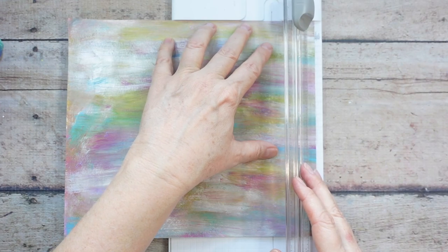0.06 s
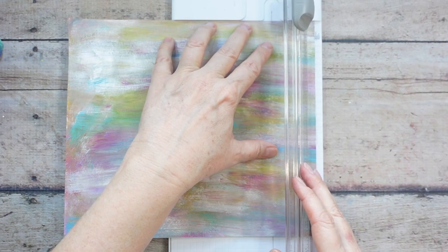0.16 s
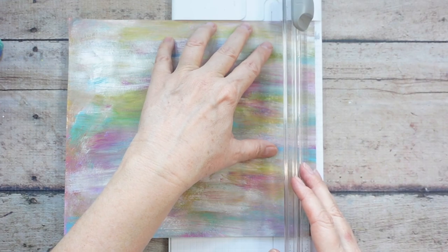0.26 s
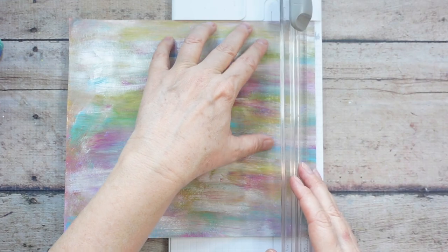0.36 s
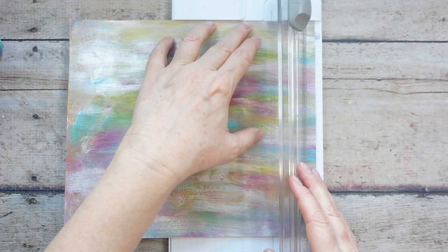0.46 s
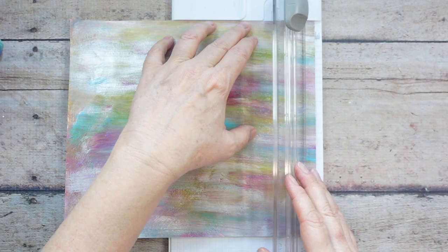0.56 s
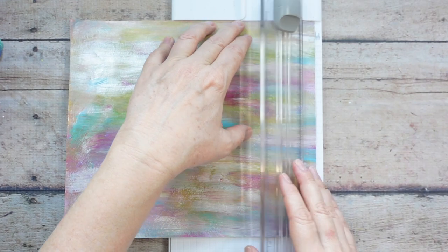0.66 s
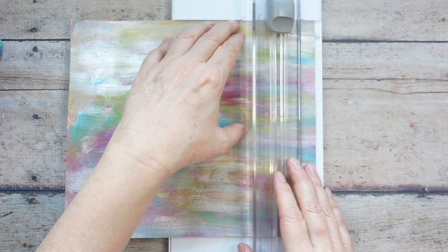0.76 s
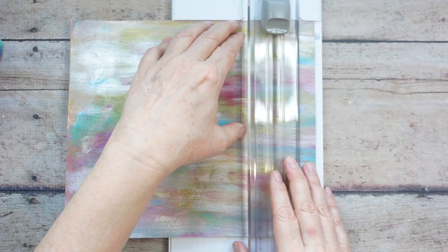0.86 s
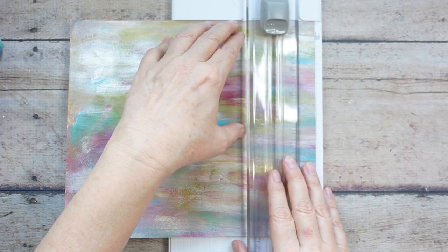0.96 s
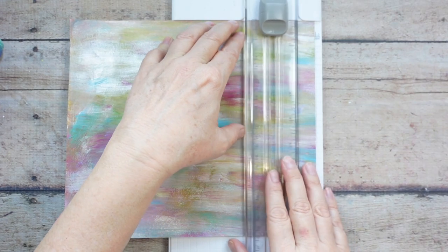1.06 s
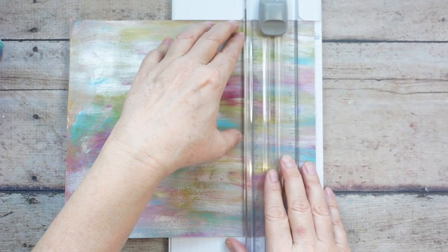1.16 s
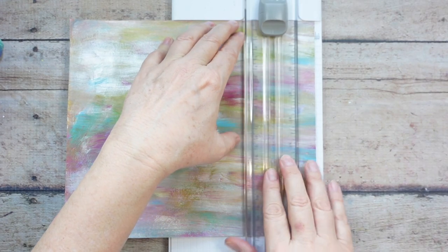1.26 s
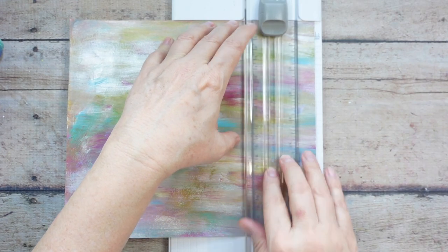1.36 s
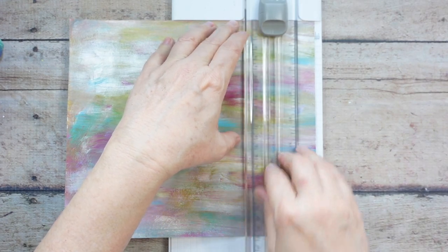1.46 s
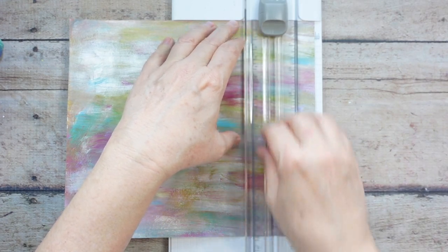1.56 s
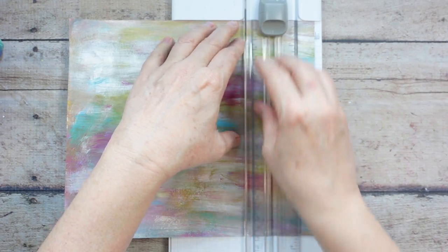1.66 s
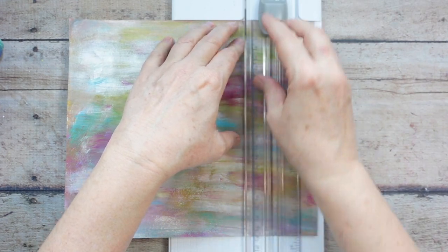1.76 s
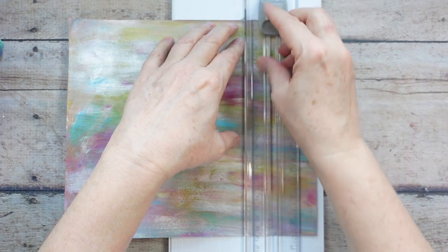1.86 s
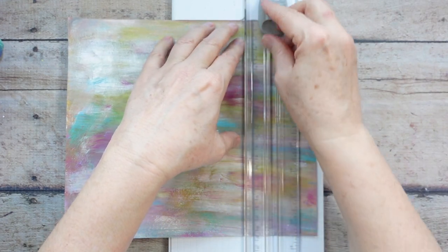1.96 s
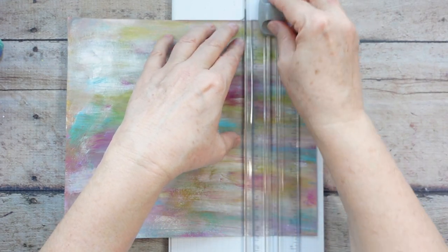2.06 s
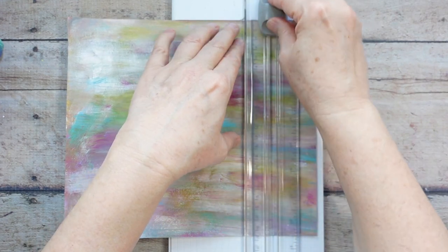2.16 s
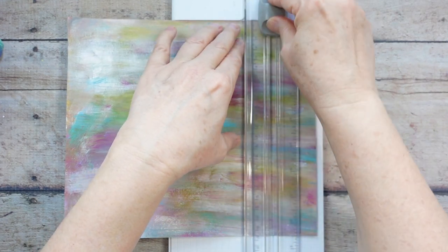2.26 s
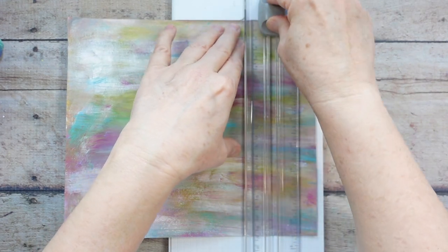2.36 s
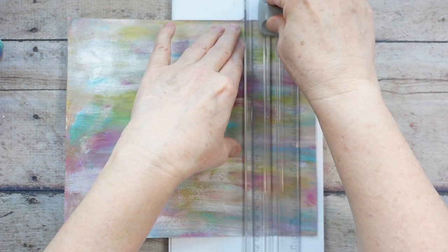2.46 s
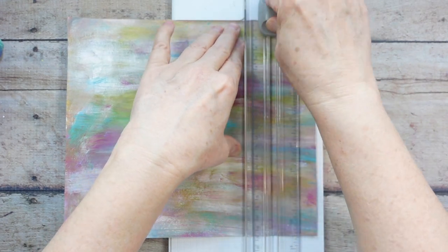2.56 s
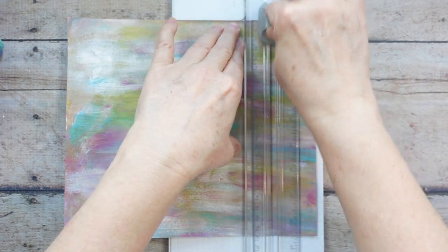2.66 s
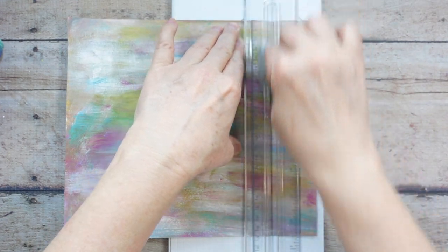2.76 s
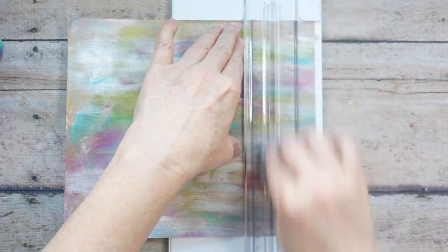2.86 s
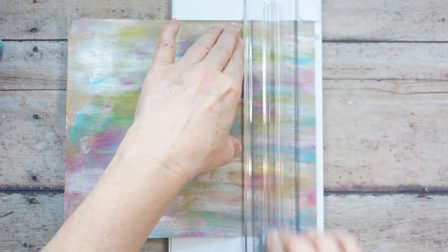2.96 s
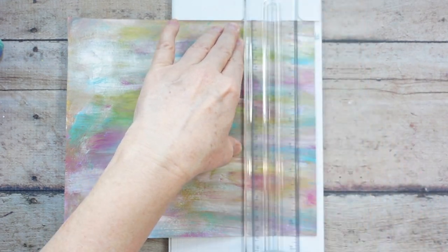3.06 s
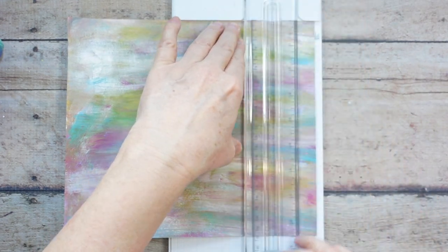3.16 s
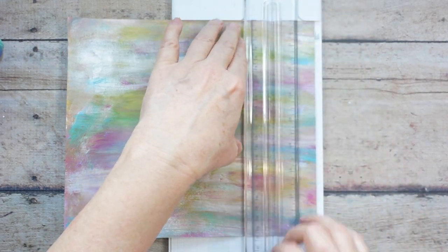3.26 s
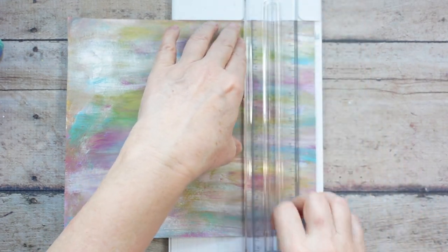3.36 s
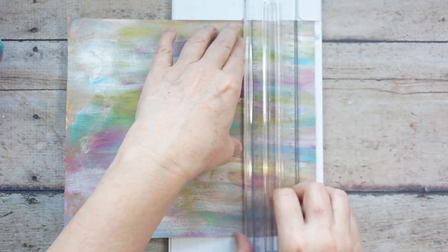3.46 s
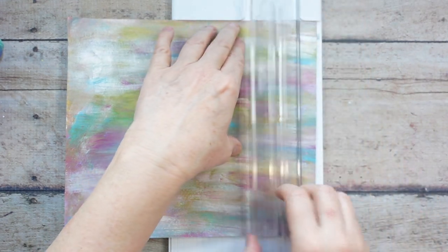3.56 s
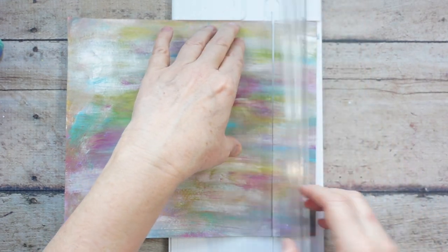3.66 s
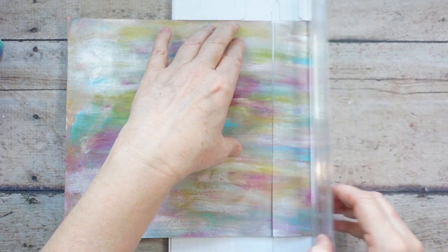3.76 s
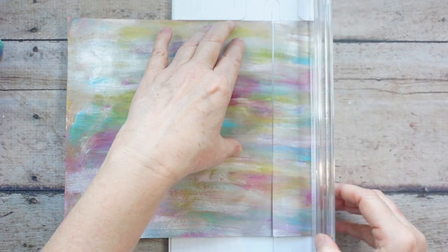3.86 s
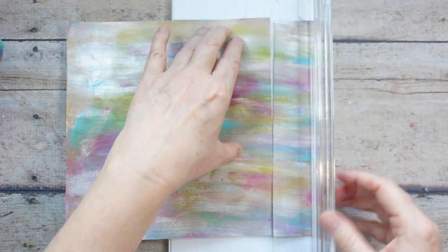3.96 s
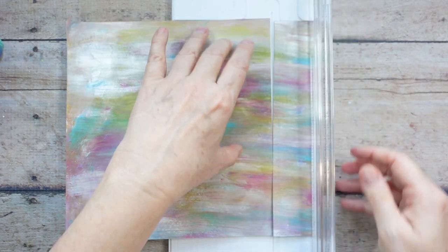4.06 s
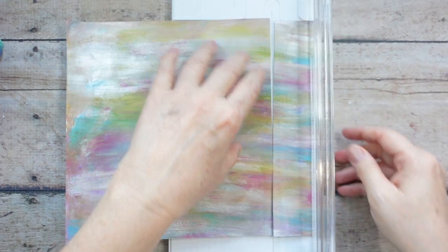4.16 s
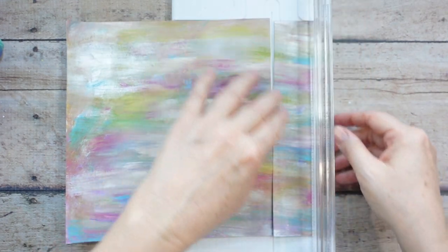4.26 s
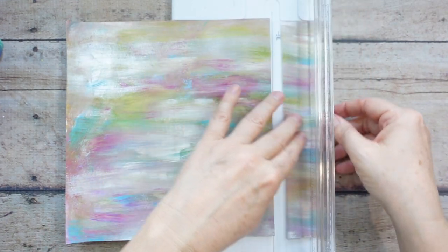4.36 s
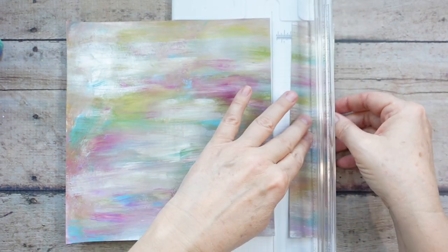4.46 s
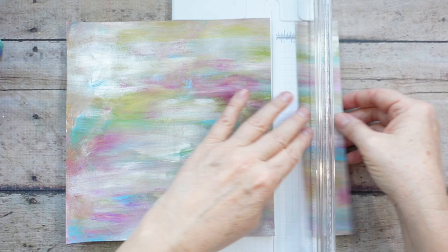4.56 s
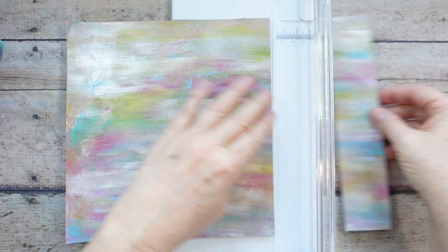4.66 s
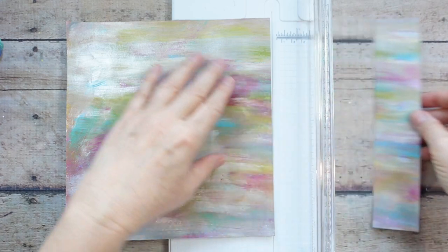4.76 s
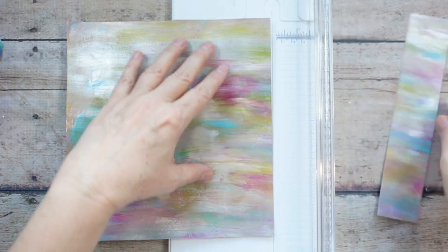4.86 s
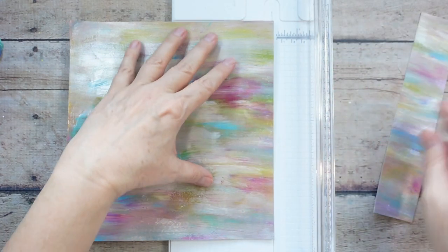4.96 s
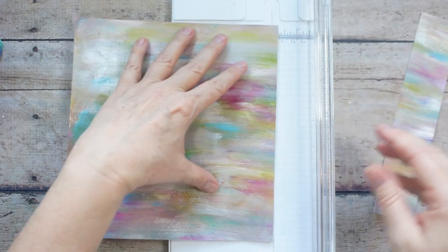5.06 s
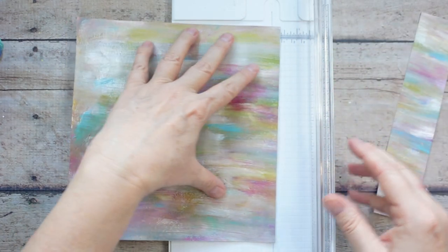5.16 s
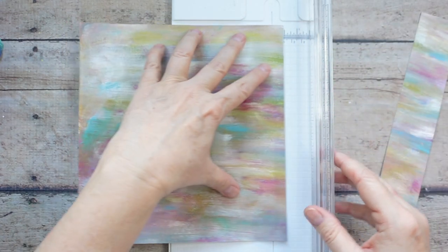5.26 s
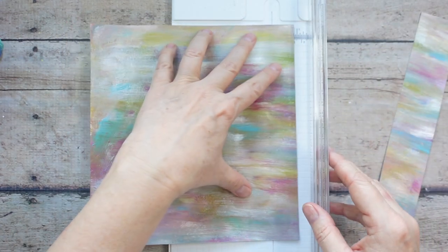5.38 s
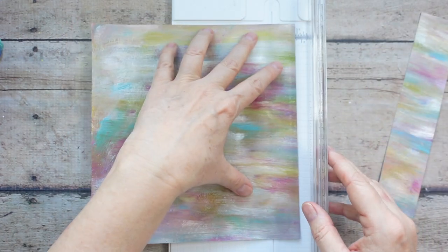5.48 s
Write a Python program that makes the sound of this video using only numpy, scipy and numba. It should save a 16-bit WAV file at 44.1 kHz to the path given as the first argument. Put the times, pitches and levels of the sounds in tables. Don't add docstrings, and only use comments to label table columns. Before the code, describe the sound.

A small, quiet room heard from close above a wooden table, with soft hush and a faint, flickering fan whirr throughout. Faint plastic creaks at 0.35-0.6 s lead to a crisp clap of the rail at 0.64 s and a second snap at 1.1 s. Sparse finger taps, nail scuffs and light rubs follow from 1.3 to 2.3 s. At about 2.65 s the blade bites with a thin high ring, then rasps harshly through the sheet, loudest around 2.9 s with a hard woody knock, another at 3.0 s, and a brief singing release by 3.1 s. Small stop knocks, clicks and finger rubs fill 3.2-3.6 s. The rail lifts with dull scraping at 3.8-3.9 s and clicks sharply at 4.0 s. Paper swishes from 4.36 s, flicks loudly at 4.67 s, peels with a rising whistle at 4.8 s, snaps brightly at 4.91 s, then slides softly until about 5.45 s.

```python
import sys
import numpy as np
from scipy import signal
from scipy.fft import rfft, irfft, next_fast_len
from scipy.io import wavfile
from scipy.ndimage import uniform_filter1d
from numba import njit

SR = 44100
rng = np.random.default_rng(int(sys.argv[2]) if len(sys.argv) > 2 else 0)


def transcribe(u):
    v = np.clip(np.atleast_2d(u).T, -1, 1)
    q = np.round(v * 32767).astype(np.int16)
    wavfile.write(sys.argv[1], SR, q)


def volts(x):
    e = np.asarray(x, float) / 20
    return 10 ** e


N = 243431

# time in seconds, carriage effort in dB, bite of the edge in dB.
CUT_STROKE = [
    (2.6, -78, -1),
    (2.64, -66.5, -1),
    (2.668, -48, -2.5),
    (2.71, -44, -0.5),
    (2.732, -49, 5.5),
    (2.794, -37, 1.5),
    (2.918, -32.5, 1),
    (3.048, -45, 2),
    (3.15, -70, 2),
]
# time in seconds, pitch in Hz, share in dB.
BLADE_SONG = [
    (2.63, 8370, 5),
    (2.71, 8430, -4.5),
    (2.74, 7600, -8),
    (3.0, 7600, -26),
    (3.035, 6900, 11),
    (3.06, 6860, 4.5),
    (3.085, 6960, -20),
]
# resonance in Hz, width in Hz, level in dB.
CUT_BOARD = [(550, 77, -8), (707, 76, 3.5), (848, 76, 3.5), (1055, 58, 7), (1203, 170, 0.5), (1454, 103, 4),
             (1700, 230, 2.5), (2180, 1270, -3.5)]
# resonance in Hz, width in Hz, level in dB.
CUT_FIBRE = [(3400, 270, 2.5), (3970, 480, 5.8), (4500, 550, 7.1), (5000, 470, 8.2), (6000, 1460, 5.7)]
# resonance in Hz, width in Hz, level in dB.
CUT_BLADE = [(6600, 210, -21), (7600, 2000, 1.5), (8640, 1500, 1), (10000, 3500, -8.5),
             (13300, 2700, -10.5), (14900, 1300, -22)]
# mode in Hz, level in dB, 60 dB decay in seconds.
BOARD_MODES = [(511.6, -3.5, 0.81), (747, -3.5, 0.021), (832, 7, 0.035), (1054, 0, 0.023),
               (1255, 2.5, 0.16), (1510, -5.5, 0.031), (1910, 0.5, 0.035)]
# mode in Hz, level in dB, 60 dB decay in seconds.
TABLE_MODES = [(110, -18, 0.71), (178, -0.5, 0.42), (240, -6, 0.089), (364, 6.5, 0.13)]

# frequency in Hz, level in dB.
RUB_COLOUR = [(1200, -44), (2200, 9), (4500, 13), (6500, 4), (8000, -48), (12000, -61)]
# frequency in Hz, level in dB.
HISS_COLOUR = [(5000, -19.5), (7000, 0), (8000, 0), (10000, -2), (13000, -12), (16000, -20)]
# start, rise and fall in seconds, peak in dB, air gap in Hz.
HINGE = [
    (0, .002, 0.078, -80, 3400),
    (.67, 0.0027, 0.18, -62.5, 3100),
    (1.12, 0.0017, 0.26, -68.5, 3440),
]
# start, rise and fall in seconds, peak in dB, air gap in Hz.
CREAK = [
    (.345, 0.07, 0.082, -66, 3440),
    (.44, 0.067, 0.13, -66.5, 3400),
    (1.14, 0.071, 0.07, -69, 3450),
]
# start, rise and fall in seconds, peak in dB, air gap in Hz.
SETTLE = [
    (.646, 0.0017, 0.03, -50.5, 3080),
    (1.106, 0.0013, 0.015, -49.5, 3680),
]
# start, rise and fall in seconds, peak in dB, air gap in Hz.
FINGERS = [(1.515, 0.015, 0.024, -62.5, 3400), (1.555, 0.017, 0.083, -58, 3550),
           (2.122, 0.0011, 0.017, -59, 4600), (2.138, .002, 0.35, -72, 4660),
           (2.28, 0.088, 0.045, -60.5, 4350), (3.22, 0.026, 0.036, -62.5, 3400),
           (3.308, 0.0021, 0.063, -64.5, 3120), (3.39, 0.0073, 0.089, -60, 2950),
           (3.46, 0.032, 0.092, -58, 2820), (3.58, 0.016, 0.083, -66.5, 3970),
           (3.66, 0.0095, 0.13, -72, 2770)]
# start, rise and fall in seconds, peak in dB, air gap in Hz.
REACH = [
    (1.68, 0.19, 0.22, -73.5, 5670),
    (4.25, 0.057, 0.062, -76.5, 5940),
]
# start, rise and fall in seconds, peak in dB, air gap in Hz.
LIFT = [(3.8175, 0.0016, 0.034, -52, 1100), (3.828, 0.017, 0.028, -42.5, 1400),
        (3.855, 0.019, .035, -47, 1520), (3.889, 0.0038, 0.039, -47.5, 1390),
        (3.9, 0.0089, 0.07, -50.5, 1400), (4.425, 0.021, 0.034, -53.5, 1180),
        (4.455, 0.016, 0.032, -49, 1540), (2.645, 0.028, 0.037, -61, 1130), (2.685, .022, .025, -47, 1600),
        (2.79, .015, .02, -44, 850), (4.64, .012, .02, -56, 1600)]
# start, rise and fall in seconds, peak in dB, air gap in Hz.
SCRAPE = [
    (3.832, 0.019, 0.016, -55, 3550),
    (3.888, 0.011, 0.014, -54, 3560),
    (3.955, .004, 0.018, -64, 4200),
]
# start, rise and fall in seconds, peak in dB, air gap in Hz.
RAIL_RING = [
    (3.991, 0.0017, 0.018, -57, 3000),
    (4.02, .002, 0.22, -66, 3070),
]
# start, rise and fall in seconds, peak in dB, air gap in Hz.
REBOUND = [
    (4.008, 0.0038, 0.028, -45, 3000),
    (4.062, .01, .012, -55, 3150),
    (2.3, .003, .01, -66, 3500),
    (3.255, 0.0026, .025, -56, 3450),
]
# start, rise and fall in seconds, peak in dB, air gap in Hz.
SWISH = [
    (4.36, 0.048, 0.096, -47, 5570),
    (4.595, 0.025, 0.035, -51, 4700),
    (4.88, 0.031, 0.069, -51.5, 4800),
    (5.35, 0.028, 0.11, -59, 7040),
]
# start, rise and fall in seconds, peak in dB, air gap in Hz.
DRAG = [
    (4.5, 0.055, 0.03, -64, 4500),
    (4.63, .03, 0.033, -61.5, 3000),
    (4.94, 0.17, 0.081, -63.5, 4640),
]
# start, rise and fall in seconds, peak in dB, air gap in Hz.
TUG = [
    (4.562, 0.0057, 0.037, -54, 4700),
    (4.605, 0.019, .012, -61, 3300),
]
# start, rise and fall in seconds, peak in dB, air gap in Hz.
FLICK = [
    (4.655, 0.023, 0.024, -33, 2300),
    (4.658, 0.0057, .01, -44.5, 3500),
]
# start, rise and fall in seconds, peak in dB, air gap in Hz.
TRAIL = [
    (4.695, .002, 0.096, -59, 2330),
]
# start, rise and fall in seconds, peak in dB, air gap in Hz.
PEEL = [
    (4.804, 0.0017, 0.093, -51.5, 2620),
]
# start, rise and fall in seconds, peak in dB, air gap in Hz.
SKIM = [
    (5.1, 0.087, 0.09, -61, 4670),
]
# start, rise and fall in seconds, peak in dB, air gap in Hz.
PUSH = [
    (5.2, 0.11, 0.1, -55, 5060),
    (5.33, .07, .075, -58, 5200),
]

# time in seconds, gap pitch in Hz, level in dB.
GAP_SLIDES = [
    [(.35, 3450, -80), (.45, 3400, -76), (.53, 3300, -64.5), (.6, 3100, -74), (.63, 3120, -77)],
    [(4.803, 2700, -62), (4.808, 2600, -49.5), (4.835, 2640, -53.5), (4.86, 2800, -65),
     (4.885, 3470, -55.5), (4.912, 4360, -57.5), (4.94, 4800, -70), (4.955, 4800, -78)],
    [(4.97, 4650, -82), (5.0, 4520, -67), (5.06, 4500, -73), (5.1, 4350, -64), (5.14, 4370, -65),
     (5.175, 4600, -56), (5.2, 5030, -61), (5.25, 6000, -67), (5.3, 6600, -76)],
    [(5.22, 4500, -76), (5.31, 4600, -66), (5.4, 4900, -69), (5.45, 5000, -82)],
]
GAP_SHARES = [.16, .2, .15, .25]

# time in seconds, peak in dB, crack in Hz, board against crack in dB.
RAIL_TAPS = [(.6392, -33, 3460, -20), (1.1044, -38, 4400, -10.5), (1.5174, -52.5, 3450, 3),
             (1.6187, -50, 4930, -14), (1.6844, -56.5, 3580, 4), (2.1176, -43.5, 5050, -9),
             (2.2064, -59, 3550, 1), (2.595, -54.5, 2370, -21), (3.8182, -52, 2000, 5),
             (3.8447, -51, 2310, 14.5), (4.187, -56.5, 5200, -8)]
# time in seconds, peak in dB, crack in Hz, board against crack in dB.
NAIL_SCUFFS = [(1.3169, -56, 3720, -20), (1.3443, -53.5, 7400, -6), (1.5713, -49.5, 9400, -15),
               (2.0956, -50, 2500, -5), (3.5134, -45, 2340, 3.5), (3.5853, -53, 4830, -18),
               (4.6014, -43, 3300, -2.5), (5.1672, -53, 4430, -19), (5.3094, -49.5, 6230, 1.5)]
# time in seconds, peak in dB, crack in Hz, board against crack in dB.
CARRIAGE_KNOCKS = [(1.5287, -52, 2200, -6), (2.1414, -65.5, 3660, 16), (2.2732, -45, 5500, -1.5),
                   (2.6455, -44, 1720, -13), (2.898, -41, 7380, 0), (2.9234, -22, 2580, -0.5),
                   (2.9349, -31, 6180, -3), (3.0014, -29.5, 2360, 2), (3.0689, -38, 3250, -1.5),
                   (3.2555, -47, 3470, 7), (3.3079, -48, 4500, 10.5), (3.2615, -59, 3400, 10.5),
                   (3.8906, -57, 2300, 20.5)]
# time in seconds, peak in dB, crack in Hz, board against crack in dB.
END_STOP = [
    (3.2208, -43, 5100, 6.9),
    (2.8, -44.5, 2200, 3.9),
    (4.9, -75, 1500, 16),
]
# time in seconds, peak in dB, crack in Hz, board against crack in dB.
CRISP_SNAPS = [(3.3294, -49, 3500, -11), (3.3955, -44, 4500, -13), (2.672, -49, 10000, -18),
               (3.8038, -53, 4500, -22), (3.8041, -51, 9900, -21), (4.0844, -46, 5000, -5.5),
               (4.148, -47, 6800, -16), (4.529, -49, 4500, -6), (1.0934, -34.5, 3580, -30),
               (1.0978, -39, 4500, -11), (3.409, -50.5, 2500, -3.5), (3.5145, -42.5, 7050, -13),
               (4.9137, -30.5, 7650, -31)]
# time in seconds, peak in dB, crack in Hz, board against crack in dB.
RAIL_SNAP = [
    (4.0056, -22.5, 3040, -20.5),
]
# time in seconds, peak in dB, crack in Hz, board against crack in dB.
PAPER_SNAPS = [
    (4.6718, -47, 2220, 7),
    (4.678, -34.5, 2700, -11),
    (4.8055, -43, 2740, -7.5),
    (4.8244, -42, 2740, -24),
]
# time in seconds, peak in dB, pitch in Hz.
BUMPS = [(2.789, -58, 100), (2.861, -58, 95), (2.93, -56, 100), (3.42, -70, 95), (3.62, -74, 95),
         (3.29, -63.5, 295), (0.649, -72, 118), (1.106, -62.5, 148), (1.105, -53.5, 533), (1.2, -82, 170),
         (1.501, -61, 363), (1.528, -56.5, 378), (1.534, -65, 110), (1.66, -60, 337), (1.692, -60, 123),
         (1.878, -64, 276), (2.138, -63, 360), (2.275, -63, 122), (2.358, -60, 373), (2.725, -69, 350),
         (2.893, -34, 360), (3.002, -46.5, 155), (3.681, -62, 414), (3.223, -55, 136), (3.398, -59, 386),
         (3.512, -53, 290), (3.817, -53.5, 172), (3.846, -61, 157), (3.892, -57, 190), (4.45, -61, 164),
         (4.599, -66, 377), (5.352, -59.5, 121)]

# time in seconds, left minus right in dB.
HANDS = [
    (0, 1),
    (2.9, -1),
    (3.4, 1.5),
    (3.75, 2),
    (4.9, -4),
    (5.2, 1),
]
# frequency in Hz, level in dB.
AIR_MID = [(15, -81), (25, -67), (114, -20), (292, -20), (544, -19), (623, -19.5), (886, -8), (1040, -19),
           (1130, -19), (1480, -15), (2470, -25.5), (4990, -30), (7290, -33), (9810, -34), (16000, -37.5)]
# frequency in Hz, level in dB.
AIR_SIDE = [(15, -70), (90, -26), (383, -16.5), (575, -17.5), (862, -6.5), (1330, -16), (1690, -14),
            (10100, -34), (16000, -51)]


def blade():
    at, fade, (effort_db, bite_db) = stroke(CUT_STROKE)
    sing_hz, sing_db = track(BLADE_SONG, np.arange(N))
    judder = grit(N, spread_db=2.2, patchy_db=1.5, rate=120)
    tear = grit(N, spread_db=2.2, patchy_db=1.6, rate=150)

    board = body(judder, CUT_BOARD, wander_db=2.2)
    table_rumble = steep(body(judder, widths(TABLE_MODES), wander_db=4.2), hz=240.0, share=2.3)
    carriage = board + volts(-13) * table_rumble

    sing = steep(tear, sing_hz, share=.1) * volts(2 * walk(40))
    hiss = body(tear, CUT_BLADE, wander_db=2.2) + volts(sing_db) * sing
    hiss /= np.sqrt(1 + volts(2 * sing_db))
    edge = volts(-4) * body(tear, CUT_FIBRE, wander_db=2.0) + volts(-3.5) * hiss

    out = np.zeros(N)
    out[at] = (carriage[at] + volts(bite_db) * edge[at]) * volts(effort_db) * fade
    return out


def rubbing():
    out = np.zeros(N)
    slip = grit(N, spread_db=1.8, patchy_db=1.8, rate=90)
    plain = colour(slip, RUB_COLOUR)
    hiss = colour(slip, HISS_COLOUR)
    board = steep(body(slip, widths(BOARD_MODES, grip=6.5), wander_db=3.2), hz=1200.0, share=3.3)
    other = np.roll(slip, shift=1500)
    gap_swell = volts(1.9 * walk(44))
    edge_swell = volts(1.5 * walk(40))

    def add(rows, lead_db, drop_db, gap_db, share, octaves, hiss_db, board_db,
            edge_hz=7500, edge_db=-15, edge_share=0.28, bloom=0.27, late=1.8):
        for s, rise, fall, peak_db, hz in rows:
            rise, fall = max(rise, .001), max(fall, .005)
            at, fade, (db, part) = stroke([(s, peak_db - lead_db, 0),
                                           (s + rise, peak_db, rise / (rise + fall)),
                                           (s + rise + fall, peak_db - drop_db, 1)])
            gap_hz = hz * 2 ** (octaves * part ** late)
            gap = steep(other[at], gap_hz, share) * gap_swell[at] * volts(bloom * (db - peak_db))
            edge = steep(slip[at], edge_hz, edge_share) * volts(edge_db) * edge_swell[at]
            sound = (plain[at] + volts(gap_db) * gap) / np.sqrt(1 + volts(2 * gap_db))
            sound += volts(hiss_db) * (hiss[at] + edge)
            sound += volts(board_db) * board[at]
            out[at] += sound * volts(db - 3) * fade

    add(HINGE, lead_db=6, drop_db=10.0, gap_db=-1, share=.17, octaves=-0.079, hiss_db=-10, board_db=-3.0)
    add(RAIL_RING, lead_db=8, drop_db=10.5, gap_db=-23.0, share=.2, octaves=.01, hiss_db=-10, board_db=0.5)
    add(CREAK, lead_db=7, drop_db=12, gap_db=-4.5, share=0.12, octaves=-0.19, hiss_db=-3.5, board_db=-6,
        bloom=.9)
    add(SKIM, lead_db=16, drop_db=8.0, gap_db=9, share=0.68, octaves=0.3, hiss_db=-7.0, board_db=-35)
    add(SCRAPE, lead_db=18.5, drop_db=18, gap_db=13, share=0.53, octaves=.01, hiss_db=-17, board_db=-15)
    add(REBOUND, lead_db=8, drop_db=18, gap_db=-2, share=0.15, octaves=.01, hiss_db=-20, board_db=-16.5)
    add(TUG, lead_db=10, drop_db=0, gap_db=0, share=.4, octaves=-0.054, hiss_db=-9.5, board_db=-4,
        edge_hz=6480, edge_db=-3, edge_share=.05)
    add(TRAIL, lead_db=18, drop_db=13, gap_db=-41, share=.2, octaves=0.011, hiss_db=-10, board_db=-4)
    add(PUSH, lead_db=15.5, drop_db=20, gap_db=-3.5, share=0.71, octaves=0.18, hiss_db=-3.0, board_db=-1.5,
        edge_hz=6800, edge_db=-7, edge_share=0.17)
    add(SETTLE, lead_db=-7, drop_db=19, gap_db=-3.0, share=0.037, octaves=.01, hiss_db=-30, board_db=-6.0)
    add(FINGERS, lead_db=16, drop_db=18, gap_db=-10, share=0.091, octaves=-0.0032, hiss_db=-5.0, board_db=2,
        edge_hz=14000, edge_db=-20.5, edge_share=0.083)
    add(REACH, lead_db=2.0, drop_db=18, gap_db=-2, share=0.17, octaves=0.034, hiss_db=0.5, board_db=1.5,
        edge_hz=9950, edge_db=-8.0, edge_share=0.09)
    add(LIFT, lead_db=18, drop_db=17.5, gap_db=12.5, share=0.45, octaves=-0.052, hiss_db=-36, board_db=-1.0,
        bloom=0.055)
    add(SWISH, lead_db=19, drop_db=25.0, gap_db=-9, share=0.49, octaves=-0.3, hiss_db=-3.0, board_db=-11.0,
        edge_hz=6900, edge_db=-8.5, edge_share=0.56)
    add(DRAG, lead_db=8, drop_db=5.0, gap_db=-12.0, share=0.38, octaves=0.11, hiss_db=-4.5, board_db=-6.0,
        edge_hz=6800, edge_db=-6, edge_share=0.099)
    add(FLICK, lead_db=20, drop_db=26, gap_db=8, share=0.42, octaves=.01, hiss_db=-23.0, board_db=-14.5)
    add(PEEL, lead_db=13, drop_db=4, gap_db=2.5, share=0.57, octaves=0.96, hiss_db=-13.5, board_db=-21,
        bloom=0.058, late=5.4)
    return out


def gaps():
    out = np.zeros(N)
    fine = grit(N, spread_db=1.5, patchy_db=1.2, rate=70)
    for table, share in zip(GAP_SLIDES, GAP_SHARES):
        at, fade, (hz, db) = stroke(table)
        out[at] += steep(fine[at], hz, max(share, .03)) * volts(db) * fade
    return out


def taps():
    out = np.zeros(N + SR)
    t = np.arange(SR // 12) / SR

    def add(rows, board_hz, scatter_s, share=0.9, bright=0.41):
        for s, db, hz, board_db in rows:
            push = 0.26 * rng.standard_normal(len(t)) * np.exp(-t / max(scatter_s, 1e-4))
            push[0] = 1
            crack = steep(push, hz, share) + bright * steep(push, 4200.0, 0.78)
            crack /= np.max(np.abs(crack))
            board = steep(body(push, widths(BOARD_MODES)), board_hz, 1.92)
            board += 0.62 * steep(push, board_hz, .15)
            board *= 1 - np.exp(-t / 0.0038)
            board /= np.max(np.abs(board))
            i = int(s * SR)
            out[i:i + len(t)] += volts(db) * (crack + volts(board_db) * board)

    add(RAIL_TAPS, board_hz=860, scatter_s=0.0058)
    add(NAIL_SCUFFS, board_hz=863, scatter_s=0.008)
    add(CARRIAGE_KNOCKS, board_hz=1340, scatter_s=0.0039)
    add(END_STOP, board_hz=527, scatter_s=0.0079)
    add(CRISP_SNAPS, board_hz=1466, scatter_s=0.00082, share=0.76, bright=0.19)
    add(RAIL_SNAP, board_hz=1400, scatter_s=0.00079, share=0.35, bright=0.25)
    add(PAPER_SNAPS, board_hz=1850, scatter_s=0.0026)
    return out[:N]


def bumps():
    out = np.zeros(N + SR)
    t = np.arange(SR // 4) / SR
    for s, db, hz in BUMPS:
        push = rng.standard_normal(len(t)) * (1 - np.exp(-t / 0.00094)) * np.exp(-t / 0.035)
        boom = steep(push, hz, share=.9)
        i = int(s * SR)
        out[i:i + len(t)] += volts(db) * boom / np.max(np.abs(boom))
    return out[:N]


def echoes(x):
    low_t60_s, treble_t60_s, first_s = .33, 0.37, 0.0064
    t = np.arange(SR // 2) / SR
    low = signal.lfilter([.3], [1, -.7], rng.standard_normal((2, len(t))))
    high = np.diff(rng.standard_normal((2, len(t) + 1))) / 4
    tail = low * volts(-60 * t / low_t60_s) + high * volts(-60 * t / treble_t60_s)
    tail *= np.clip(t / first_s, 0, 1) ** 2
    tail /= np.sqrt(np.sum(tail ** 2, axis=1, keepdims=True))
    return signal.fftconvolve(x[None], tail, axes=1)[:, :N]


def air():
    fan_hz, fan_width_hz, fan_db = 867, 90, -74.5
    hush_db, side_db, left_db = -71, -69.5, 3.5
    sides = np.array([[1], [-1]])
    mid = colour(rng.standard_normal(N), AIR_MID)
    side = colour(rng.standard_normal(N), AIR_SIDE)
    whirr = band(rng.standard_normal(N), fan_hz, fan_width_hz)
    flicker = volts(1.5 * walk(9))
    fan = unit(band(whirr, fan_hz, 2 * fan_width_hz)) * volts(fan_db) * flicker
    swell_db = 1.2 * walk(2.5)
    middle = volts(hush_db + swell_db) * mid + fan
    return middle * volts(left_db * sides / 2) + volts(side_db) * side * sides


def grit(count, spread_db, patchy_db, rate):
    size = volts(spread_db * rng.exponential(size=count) + patchy_db * walk(rate, count=count))
    return unit(rng.standard_normal(count) * size)


def walk(rate, count=N):
    k = max(int(SR / rate), 1)
    levels = rng.standard_normal(count // 64 + 2)[:count // k + 1]
    held = np.repeat(levels, k)[:count]
    return uniform_filter1d(uniform_filter1d(held, k), k)


def stroke(table):
    at = np.arange(int(table[0][0] * SR), min(int((table[-1][0] + 0.0041) * SR), N))
    fade = np.clip(np.minimum(at - at[0], .5 * (at[-1] - at)) / (0.00035 * SR), 0, 1)
    return at, fade, track(table, at)


def track(table, at):
    s, *columns = np.transpose(table)
    return [np.interp(at / SR, s, c) for c in columns]


def widths(modes, grip=8.6):
    return [(hz, grip * np.log(1000) / np.pi / t60, db) for hz, db, t60 in modes]


def body(x, peaks, wander_db=0.):
    total = np.zeros(len(x))
    for k, (hz, width, db) in enumerate(peaks):
        swell = volts(db + wander_db * walk(35.44, count=len(x)))
        total += (-1) ** k * swell * band(x, hz, width)
    return unit(total)


def steep(x, hz, share):
    return unit(band(band(x, hz, share * hz), hz, share * hz))


def band(x, hz, width):
    hz = np.clip(hz, 30, .45 * SR)
    return svf(x, np.tan(np.pi * hz / SR) + 0 * x, width / hz + 0 * x)


@njit
def svf(x, g, k):
    y, b, l = np.empty(len(x)), 0., 0.
    for i in range(len(x)):
        v = (b + g[i] * (x[i] - l)) / (1 + g[i] * (g[i] + k[i]))
        b, l, y[i] = 2 * v - b, l + 2 * g[i] * v, k[i] * v
    return y


def colour(x, points):
    hz, db = np.transpose(points)
    size = next_fast_len(len(x))
    f = np.maximum(np.arange(size // 2 + 1) * SR / size, 1)
    gain = volts(np.interp(np.log(f), np.log(hz), db))
    return unit(irfft(rfft(x, size) * gain, size)[:len(x)])


def unit(x):
    return x / np.sqrt(np.mean(x ** 2))


def scene():
    near = blade() + rubbing() + taps() + bumps() + gaps()
    common, apart = echoes(near)
    sides = np.array([[1], [-1]])
    room = common + 0.34 * band(apart, 2500., 6000.) * sides
    treble = band(band(near, 12500., 4000.), 12500., 4000.)
    glint = volts(-14) * np.roll(treble, shift=30) * sides
    left_db = track(HANDS, np.arange(N))[0]
    return near * volts(left_db * sides / 2) + glint + volts(-12.5) * room + air()


def band_limit(x):
    return signal.sosfilt(signal.butter(12, 16110, fs=SR, output="sos"), x)


def record(dry):
    bass_cut = signal.butter(2, 60, "high", fs=SR, output="sos")
    top_cut = signal.ellip(8, .2, 60, 15900, fs=SR, output="sos")
    mix = signal.sosfilt(np.vstack([bass_cut, top_cut]), dry)
    return band_limit(mix)


dry = scene()
out = record(dry)
transcribe(out)
```